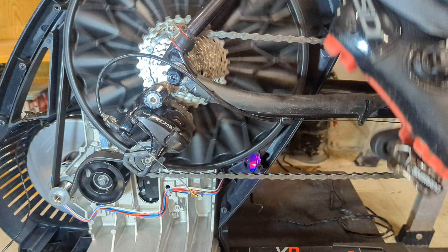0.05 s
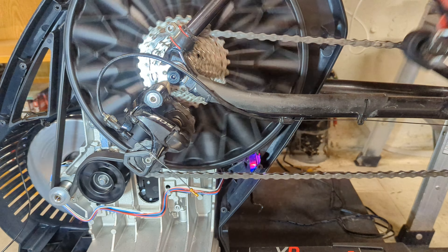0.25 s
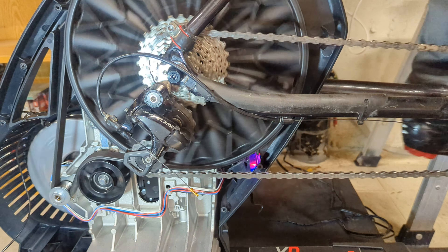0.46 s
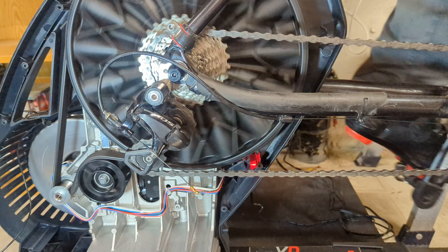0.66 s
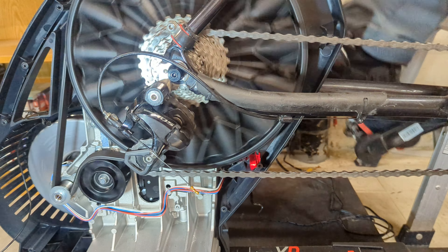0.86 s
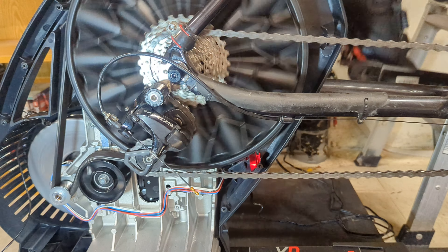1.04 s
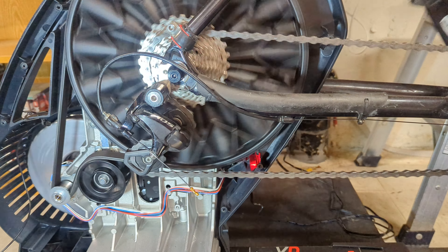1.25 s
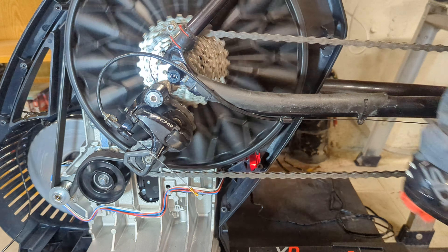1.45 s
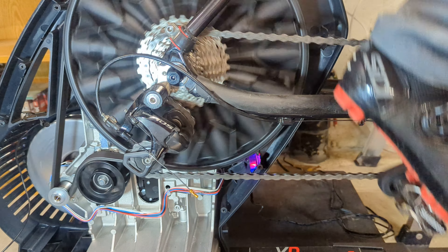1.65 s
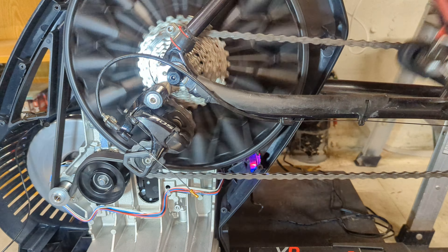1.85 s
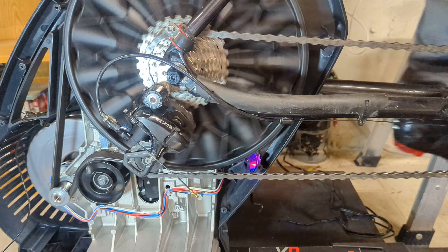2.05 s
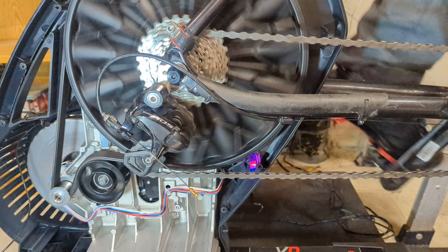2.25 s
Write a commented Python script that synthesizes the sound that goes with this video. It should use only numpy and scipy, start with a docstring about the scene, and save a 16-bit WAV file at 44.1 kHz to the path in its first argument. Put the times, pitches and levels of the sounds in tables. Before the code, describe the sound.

A bike trainer drive runs throughout, heard close in a small room with muted treble: rough mid-pitched chain and belt grinding in surges, over a broken low flywheel hum. Soft frame knocks and throaty chain rubs cluster at 0-0.3 s, then recur irregularly with tiny bright ticks. Loud metallic clanks with short boomy rattling tails hit at 0.24 and 1.3 s, the second brighter. Grinding is fuller after 0.9 s.

```python
"""Small room, close up: a direct-drive bike trainer under light pedalling.
Chain and belt grind through the open casing (tooth contacts into resonances, plus rolling noise), the flywheel
hums (wavering sine), slack in the drive knocks on the frame (softened clicks into modes, noise rattle), the chain
rubs (swelling tones), links tick (short rings, bright puffs), and twice the drive takes up with a loud clank:
hard rings, a splash, a boom in the stand and noise dying band by band. Noise-tail reflections make the room."""
import sys
import numpy as np
from scipy import signal
from scipy.io import wavfile

SR = 44100
rng = np.random.default_rng(int(sys.argv[2]) if len(sys.argv) > 2 else 0)


def int16_out(signal):
    """Quantize to a 16-bit WAV file."""
    q = np.round(np.clip(np.atleast_2d(signal).T, -1, 1) * 32767)
    wavfile.write(sys.argv[1], SR, q.astype(np.int16))


def nominal_scale(level):
    """Amplitude ratio for a level in decibels (scalar or array-like)."""
    x = np.asarray(level, float) / 20
    return 10 ** x


N = 103635
T = np.arange(N) / SR

# load on the drive, relative levels: time_s, grind_db, chatter_db
LOAD = [(0, -41, -36), (.06, -60, -55), (.13, -54.5, -41.5), (.22, -54, -59.5), (.4, -54, -58),
        (.55, -57, -51), (.68, -51.5, -45.5), (.8, -52.5, -62), (.95, -50, -51), (1.1, -50, -45.5),
        (1.25, -48, -47.5), (1.4, -56.5, -60), (1.55, -49, -46), (1.75, -48, -51), (1.9, -48.5, -54),
        (2.05, -45.5, -55), (2.2, -46.5, -68), (2.35, -49, -49.5)]
# dull knocks on the frame, relative levels: start_s, level_db, rattle_db
KNOCKS = [(0.002, -34.5, -38), (0.014, -37, -48.5), (0.049, -34, -47.5), (0.236, -28.5, -27),
          (0.244, -22.5, -40), (0.27, -30.5, -40.5), (0.287, -31.5, -47.5), (0.334, -33, -40.5),
          (0.519, -29, -56.5), (0.537, -41, -45), (1.002, -30.5, -55.5), (1.019, -46, -45.5),
          (1.2972, -20, -38), (1.308, -26.5, -36), (1.446, -35.5, -36.5), (1.645, -41, -55),
          (1.827, -29.5, -44), (1.847, -36.5, -58), (1.867, -33.5, -42), (1.886, -45, -49),
          (1.96, -43, -50), (2.034, -28, -44), (2.051, -32, -43), (2.059, -36, -45.5),
          (2.217, -33.5, -45.5), (2.239, -41, -50), (2.301, -50, -56)]


def rms_one(x):
    """Scale to rms 1."""
    return x / np.sqrt(np.mean(x ** 2) + 1e-20)


def at_hz(points, hz):
    """Interpolate a spectrum table on a log frequency axis."""
    points_hz, values = np.transpose(points)
    return np.interp(np.log(hz), np.log(points_hz), values)


def column(rows, index=1):
    """Interpolate a table column over time."""
    rows = np.array(rows)
    return np.interp(T, rows[:, 0], rows[:, index])


def drift(rate_hz):
    """Random wander of rms 1: noise through a double pole at rate_hz, run at SR / 40."""
    hop, settle = 40, 2000
    r = np.exp(-2 * np.pi * rate_hz * hop / SR)
    noise = rng.standard_normal(N // hop + settle + 2)
    slow = signal.lfilter([1], [1, -2 * r, r * r], noise)[settle:]
    return np.interp(np.arange(N) / hop, np.arange(len(slow)), rms_one(slow - slow.mean()))


def ring(x, hz, t60_s):
    """Two-pole mode: a unit click starts a decaying sine of height 1."""
    r = nominal_scale(-60 / (t60_s * SR))
    w = 2 * np.pi * hz / SR
    return signal.lfilter([0, np.sin(w)], [1, -2 * r * np.cos(w), r * r], x + 1e-18)


def softened(x, hz, t60_s):
    """Short resonance of gain 1 that rounds off an attack."""
    r = nominal_scale(-60 / (t60_s * SR))
    return ring(x, hz, t60_s) * 2 * (1 - r)


def resonance(x, hz, width_hz):
    """Two-pole resonance, output rms 1."""
    r = np.exp(-np.pi * width_hz / SR)
    w = 2 * np.pi * hz / SR
    return rms_one(signal.lfilter([1, 0, -1], [1, -2 * r * np.cos(w), r * r], x + 1e-18))


def clicks(start_s, heights):
    """Single-sample clicks at given times."""
    out = np.zeros(N)
    np.add.at(out, (np.asarray(start_s) * SR).astype(int), heights)
    return out


def dying(start_s, level_db, t60_s):
    """Envelopes that jump up at given times and decay exponentially."""
    return signal.lfilter([1], [1, -nominal_scale(-60 / (t60_s * SR))], clicks(start_s, nominal_scale(level_db)) + 1e-18)


def filtered(x, order, hz, kind):
    """Butterworth filter."""
    return signal.sosfilt(signal.butter(order, hz, kind, fs=SR, output="sos"), x)


def bands():
    """Third-octave noise bands with their centres; neighbours use separate noises."""
    edges_hz = 28 * 2 ** np.arange(0, 8.2, 1 / 3)
    white = rng.standard_normal((2, N))
    for k, (low_hz, high_hz) in enumerate(zip(edges_hz, edges_hz[1:])):
        yield np.sqrt(low_hz * high_hz), filtered(white[k % 2], 2, [low_hz, high_hz], "band")


def grind():
    """Dense uneven tooth contacts excite the casing resonances; sparser ones make the chain chatter."""
    # casing resonances: pitch_hz, width_hz, level_db
    casing_modes = [(443.3, 16, -1.5), (690, 21, 0), (770, 62, -8.5), (1257, 190, -14), (1400, 62, -1),
                    (1798, 61, -1.5), (2583, 44, -10.5)]
    grains_per_s, grain_spread_db = 800, 2.5
    chatters_per_s, chatter_hz, chatter_width_hz = 190, 1030, 170
    level_db, surge_db, speed_wander = -7, 3, .03
    sizes = nominal_scale(grain_spread_db * np.minimum(rng.exponential(1, N), 4)) * rng.choice([-1, 1], N)
    draw = rng.random((len(casing_modes) + 1, N))
    casing = np.zeros(N)
    for k, (hz, width_hz, mode_db) in enumerate(casing_modes):
        contacts = sizes * (draw[k] < grains_per_s / SR)
        casing += nominal_scale(mode_db) * resonance(contacts, hz, width_hz)
    # time warp: pitches drift with the speed
    casing = np.interp(np.cumsum(1 + speed_wander * drift(5)), np.arange(N), casing)
    chatter = sizes * (draw[-1] < chatters_per_s / SR)
    chatter = resonance(chatter, chatter_hz, chatter_width_hz)
    chatter = resonance(chatter, chatter_hz, 2 * chatter_width_hz)
    loaded = nominal_scale(column(LOAD)) * rms_one(casing) + nominal_scale(column(LOAD, index=2)) * chatter
    return nominal_scale(level_db + surge_db * drift(21)) * loaded


def roll():
    """Rolling noise of belt and bearings: shaped noise bands, flickering, level following the load."""
    # relative density: pitch_hz, level_db_per_hz
    roll_spectrum = [(25, -12.5), (60, 6), (110, -2), (180, -10), (280, 18), (370, -3), (560, 6),
                     (720, 10.5), (1100, 14.5), (1450, 9), (2050, -6.5), (2600, -2), (3600, -24),
                     (5000, -36.5), (6000, -33), (7200, -30.5)]
    level_db, follow_db_per_db, patchy_db = -49, 0.32, 1.5
    load_db, together = column(LOAD), drift(36)
    out = np.zeros(N)
    for hz, band in bands():
        flicker_db = patchy_db * (.5 * together + drift(25))
        out += nominal_scale(at_hz(roll_spectrum, hz) + flicker_db) * band
    return nominal_scale(level_db + follow_db_per_db * (load_db - load_db.mean())) * rms_one(out)


def hum():
    """Flywheel hum: a low sine of wandering pitch and broken, flickering level."""
    # rms level before flicker: time_s, level_db
    hum_level = [(0.0, -52.5), (0.225, -81.5), (0.245, -43.5), (0.42, -53), (0.47, -82), (0.52, -54.5),
                 (0.82, -71), (0.865, -47.5), (0.91, -59), (1.07, -84.5), (1.12, -56), (1.21, -81),
                 (1.255, -50), (1.292, -66.5), (1.32, -47), (1.39, -52.5), (1.43, -83), (1.58, -78.5),
                 (1.62, -59.5), (1.76, -71.5), (1.84, -52), (1.92, -62), (1.98, -49), (2.02, -58.5),
                 (2.05, -44.5), (2.11, -76), (2.18, -46.5), (2.26, -75), (2.31, -48.5), (2.35, -55)]
    pitch_hz, wander_hz, flicker_db = 145, 3, 2.5
    level = nominal_scale(column(hum_level) + flicker_db * drift(7.8))
    phase = 2 * np.pi * np.cumsum(pitch_hz + wander_hz * drift(12)) / SR
    return np.sqrt(2) * level * np.sin(phase)


def knocks():
    """Soft blows into the frame modes, a little different each time, with loose parts rattling."""
    # frame modes: pitch_hz, level_db, t60_s
    frame_modes = [(205, -17, .05), (245, -12, .055), (280, -7.5, .065), (325, -12, .05), (430, -16, .05)]
    vary_db, contact_hz, contact_t60_s, low_cut_hz = 1.5, 284.5, 0.028, 150
    rattle_band_hz, rattle_t60_s = [422, 1420], 0.051
    start_s, level_db, rattle_db = np.transpose(KNOCKS)
    vary = rng.normal(0, vary_db, (len(start_s), len(frame_modes)))
    out = np.zeros(N)
    for k, (hz, mode_db, t60_s) in enumerate(frame_modes):
        out += ring(clicks(start_s, nominal_scale(level_db + mode_db + vary[:, k])), hz, t60_s)
    out = filtered(2 * softened(out, contact_hz, contact_t60_s), 2, low_cut_hz, "high")
    # 13 dB makes up for the band filter
    shake = rng.standard_normal(N) * dying(start_s, rattle_db + 13, rattle_t60_s)
    return out + filtered(shake, 4, rattle_band_hz, "band")


def rubs():
    """Short rubs of the chain ring the casing: rough tones that swell and die away."""
    # time_s (lead_s after the onset), level_db (peak before roughness), pitch_hz
    rub_list = [(0.013, -34.5, 1070), (0.067, -41, 942), (0.119, -36, 1019), (0.178, -32, 1070),
                (0.2, -32.5, 1030), (0.207, -41, 846), (0.543, -44.5, 1380), (0.679, -39.5, 927),
                (0.89, -47, 1170), (1.086, -42, 1210), (1.153, -34.5, 1055), (1.169, -36.5, 1092),
                (1.238, -36.5, 1133), (1.419, -37, 1420), (1.447, -37.5, 690), (1.768, -40.5, 1423),
                (1.824, -39, 1400), (1.873, -40, 1030), (1.889, -41, 740), (1.964, -37.5, 1405),
                (1.991, -43, 1045), (2.013, -42, 984), (2.042, -36, 1412), (2.174, -50, 1200),
                (2.236, -38.5, 976)]
    lead_s, swell_s, t60_s, rough_db = 0.003876, 0.0053, 0.045, -0.5
    out = np.zeros(N)
    for time_s, level_db, hz in rub_list:
        t = T - time_s + lead_s
        swell = np.clip(t / swell_s, 0, 1) ** 2
        decay = nominal_scale(-60 * np.clip(t - swell_s, 0, 1) / t60_s)
        out += nominal_scale(level_db) * swell * decay * np.sin(2 * np.pi * hz * t)
    return out * nominal_scale(rough_db * drift(150))


def ticks():
    """Links tick: a short ring with a puff of bright noise; fainter puffs come at random."""
    # relative levels: start_s, level_db, pitch_hz
    tick_list = [(0.102, -52.5, 3290), (0.1378, -47, 4700), (0.186, -56, 4130), (0.2005, -47.5, 4420),
                 (0.3444, -55, 3630), (0.3903, -47, 4190), (0.3993, -55.5, 4580), (0.4306, -53, 4640),
                 (0.54, -53, 5020), (0.6419, -54, 3980), (0.7334, -46.5, 4270), (0.7704, -52, 5180),
                 (0.829, -47.5, 3600), (1.053, -56, 3730), (1.1232, -50.5, 4370), (1.171, -49.5, 3730),
                 (1.466, -44.5, 4360), (1.532, -42.5, 3460), (1.585, -51, 4000), (1.7537, -58, 3710),
                 (1.83, -52, 4100), (2.126, -49, 4150), (2.174, -55, 3760), (2.225, -46, 4000),
                 (2.3118, -50.5, 3900)]
    ring_db, ring_t60_s, soften_t60_s = -12, .025, .006
    puff_db, puff_t60_s, puff_band_hz = -6, .035, [3300, 6800]
    small_per_s, small_db, small_spread_db = 25, -71.5, 3
    out = np.zeros(N)
    for tick_s, tick_db, hz in tick_list:
        out += softened(ring(clicks([tick_s], nominal_scale(tick_db + ring_db)), hz, ring_t60_s), hz, soften_t60_s)
    start_s, level_db, _ = np.transpose(tick_list)
    small = np.flatnonzero(rng.random(N) < small_per_s / SR)
    small_levels_db = small_db + small_spread_db * rng.standard_normal(N)[small]
    puffs = dying(np.r_[start_s, small / SR], np.r_[level_db + puff_db, small_levels_db], puff_t60_s)
    return out + filtered(puffs * rng.standard_normal(N), 2, puff_band_hz, "band")


def clanks():
    """Unsteady rings at hard contacts, a bright splash, a slow stand boom, then noise dying band by band."""
    # hard contacts, level before softening: start_s, level_db, pitch_hz, t60_s
    cracks = [(0.2369, -22, 770, 0.017), (0.24, -15, 2570, 0.01), (.241, -18.5, 2120, 0.019),
              (0.2409, -14.5, 1281, 0.017), (0.242, -18.5, 1610, 0.01), (0.245, -21.5, 1380, 0.027),
              (0.25, -30.5, 2450, 0.087), (.243, -17.5, 827, 0.028), (0.241, -21, 420, 0.06),
              (.272, -29.5, 440, 0.05), (0.36, -35.5, 420, 0.077), (0.25, -22, 610, 0.045),
              (0.2407, -28.5, 4010, 0.014), (1.3044, -13, 2400, .012), (1.3048, -19, 2900, .009),
              (1.305, -19, 3700, .008), (1.3052, -24, 4500, .008), (1.3036, -33.5, 5700, 0.022),
              (1.3045, -21.5, 935, 0.062), (1.312, -28.5, 2400, 0.024), (1.318, -29, 620, 0.1),
              (1.309, -22, 281, 0.12), (1.329, -35.5, 3100, 0.015)]
    # shudder of the whole rig, relative levels: start_s, level_db, tilt_db_per_octave, boom_db
    clank_list = [(0.24, -27.5, 1, -16), (1.3042, -28.5, 2.5, -18)]
    # shudder colour: pitch_hz, level_db_per_band
    shudder = [(30, -34.5), (60, -21.5), (110, -12), (190, -5.5), (280, -7), (420, -5), (600, -2),
               (850, -8), (1300, -9.5), (2000, -17), (2700, -13.5), (3600, -13), (5000, -25.5),
               (7200, -22.5)]
    # shudder decay: pitch_hz, t60_s
    shudder_t60 = [(40, .3), (110, 0.16), (280, 0.18), (740, 0.18), (1940, 0.13), (5120, 0.14)]
    # floor and stand modes: pitch_hz, level_db, t60_s
    stand_modes = [(41.8, -16.5, 0.2), (96.7, -17, 0.18)]
    soften_cycles, loose_db = 3, 2
    splash_db, splash_t60_s, splash_cut_hz = -5.5, .015, 2500
    stand_by_knock_db, stand_soften_t60_s = -9, .15

    out = np.zeros(N)
    for crack_s, crack_db, hz, t60_s in cracks:
        out += softened(ring(clicks([crack_s], nominal_scale(crack_db)), hz, t60_s), hz, soften_cycles / hz)
    out *= nominal_scale(loose_db * drift(53))

    start_s, level_db, tilt_db, boom_db = np.transpose(clank_list)
    splash = rng.standard_normal(N) * dying(start_s, level_db + tilt_db + splash_db, splash_t60_s)
    out += filtered(splash, 2, splash_cut_hz, "high")

    # the knocks move the stand faintly too
    knock_s, knock_db, _ = np.transpose(KNOCKS)
    blows = clicks(start_s, nominal_scale(boom_db)) + clicks(knock_s, nominal_scale(knock_db + stand_by_knock_db))
    for hz, mode_db, t60_s in stand_modes:
        boom = softened(ring(blows * nominal_scale(mode_db), hz, t60_s), hz, stand_soften_t60_s)
        out += boom * nominal_scale(loose_db * drift(17))

    for hz, band in bands():
        octaves_over_1khz = max(np.log2(hz / 1000), 0)
        band_db = level_db + at_hz(shudder, hz) + tilt_db * octaves_over_1khz
        out += rms_one(band) * dying(start_s, band_db, at_hz(shudder_t60, hz))
    return out


def room(x):
    """Dense reflections: a dulled noise tail that starts after the first echo delay."""
    t60_s, first_echo_s, wall_cut_hz = .3, .012, 9500
    t = T[:SR // 2]
    tail = rng.standard_normal(len(t)) * nominal_scale(-60 * t / t60_s) * (t > first_echo_s)
    tail = filtered(tail, 1, wall_cut_hz, "low")
    return signal.fftconvolve(x, tail / np.linalg.norm(tail))[:N]


def scene():
    """All parts; the hits also reach the room, the dull knocks less so."""
    room_db = -15.5
    dull = knocks()
    bright = rubs() + ticks() + clanks()
    reflections = nominal_scale(room_db) * room(.5 * dull + bright)
    return (dull + bright + reflections + grind() + roll() + hum())[None]


def top_cut(x):
    """Nothing passes above the cut-off."""
    return signal.sosfilt(signal.butter(12, 7280, fs=SR, output="sos"), x)


def record(dry):
    """A narrow recorder: steep treble cut, faint hiss."""
    cutoff_hz, stop_db, hiss_db = 7870, 50, -92.5
    cut = signal.sosfilt(signal.cheby2(10, stop_db, cutoff_hz, fs=SR, output="sos"), dry)
    mix = cut + nominal_scale(hiss_db) * rng.standard_normal(dry.shape)
    return top_cut(mix)


dry = scene()
out = record(dry)
int16_out(out)
```